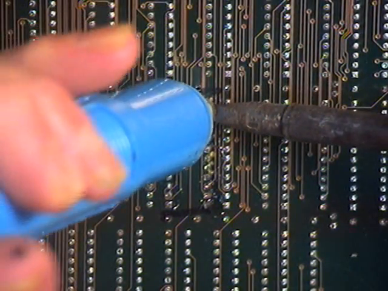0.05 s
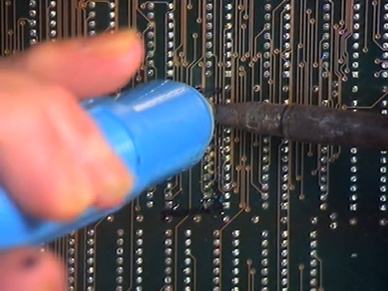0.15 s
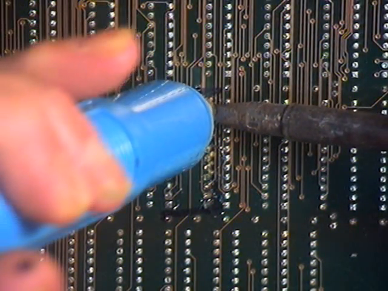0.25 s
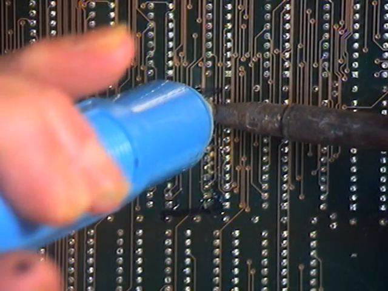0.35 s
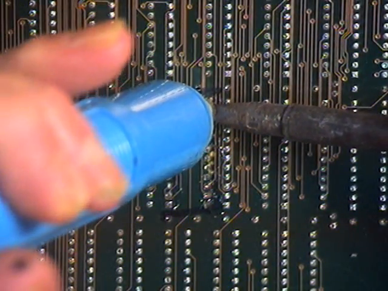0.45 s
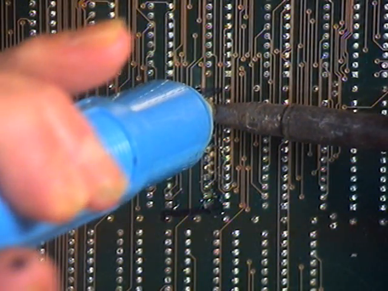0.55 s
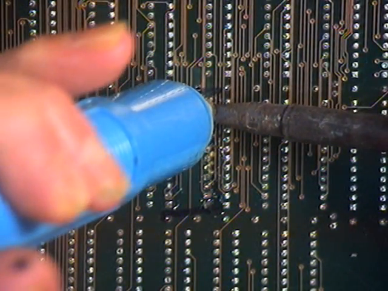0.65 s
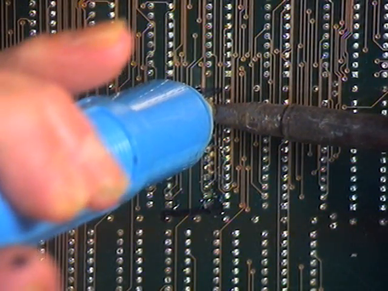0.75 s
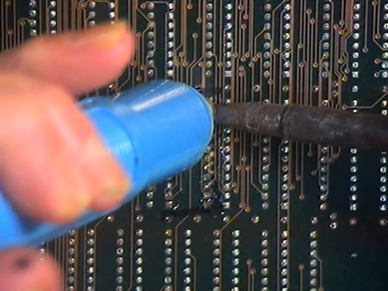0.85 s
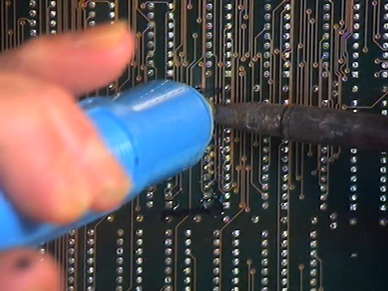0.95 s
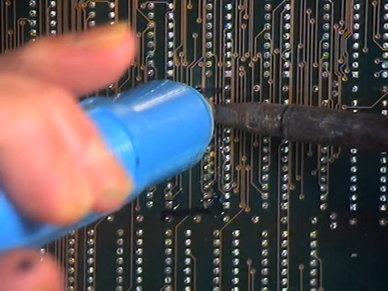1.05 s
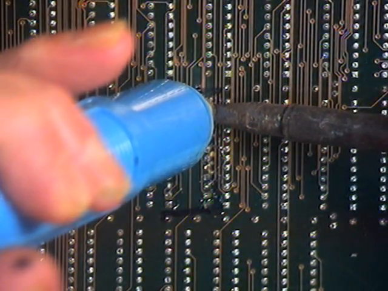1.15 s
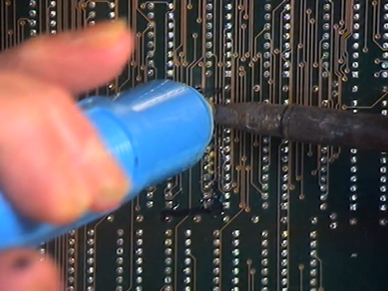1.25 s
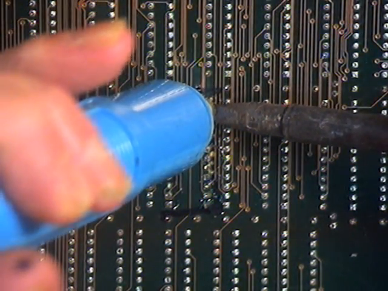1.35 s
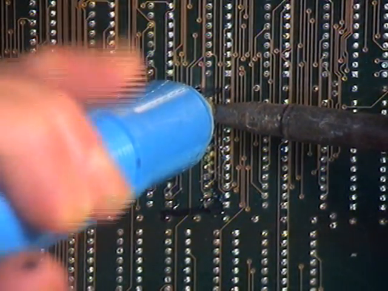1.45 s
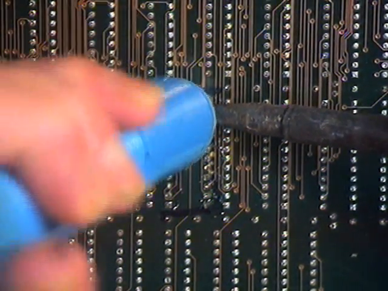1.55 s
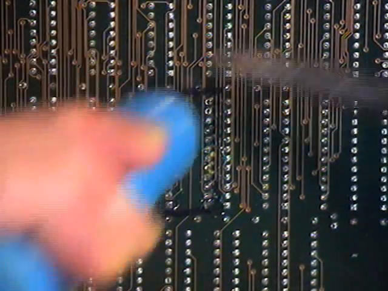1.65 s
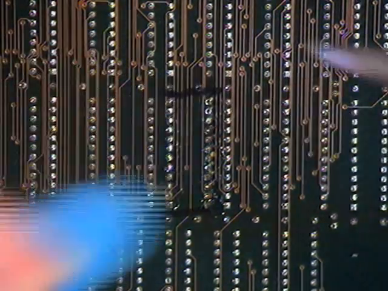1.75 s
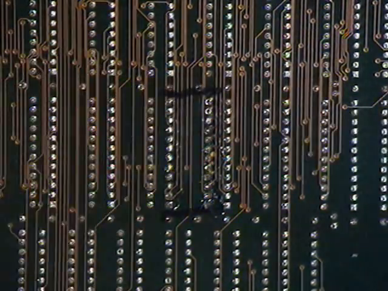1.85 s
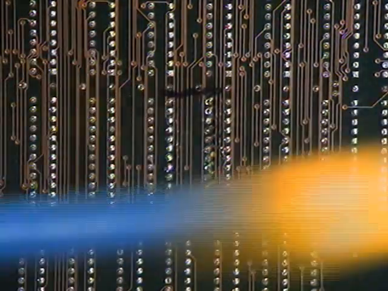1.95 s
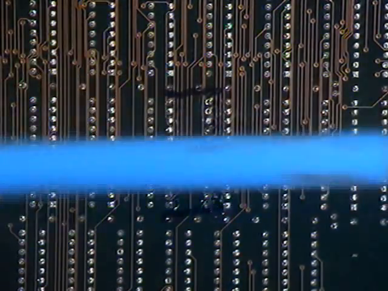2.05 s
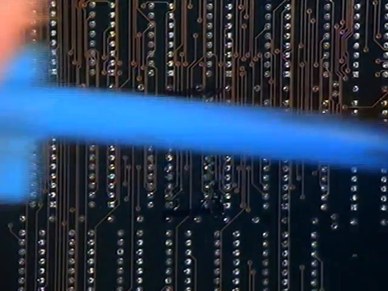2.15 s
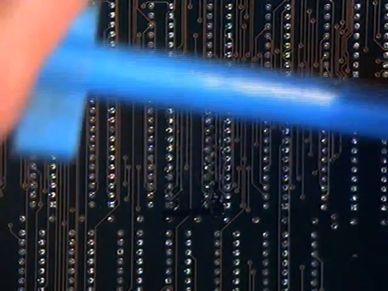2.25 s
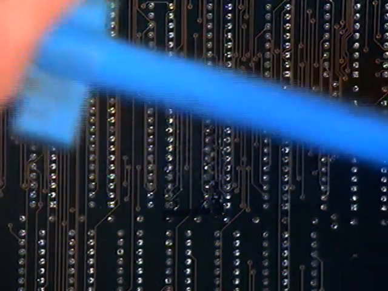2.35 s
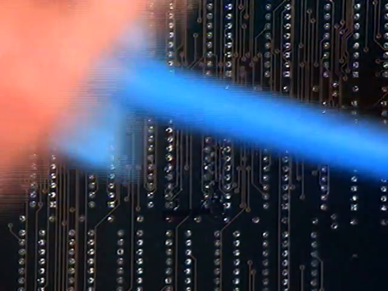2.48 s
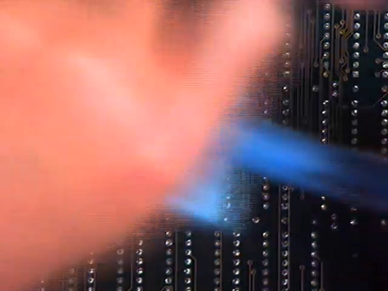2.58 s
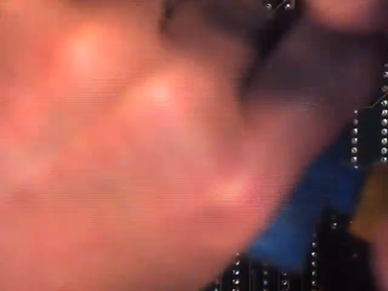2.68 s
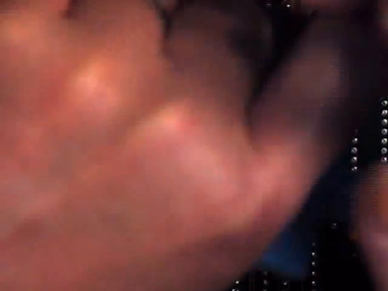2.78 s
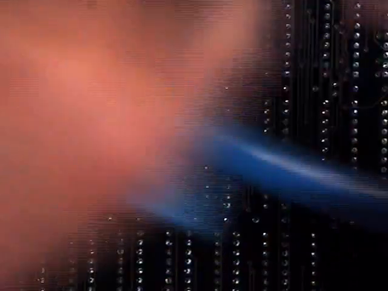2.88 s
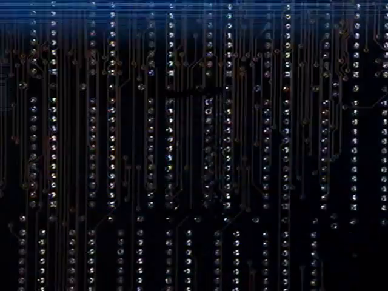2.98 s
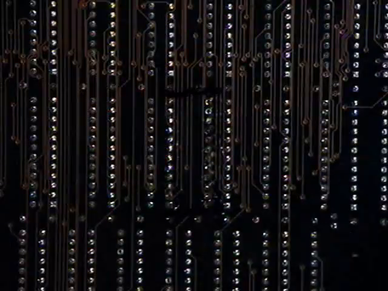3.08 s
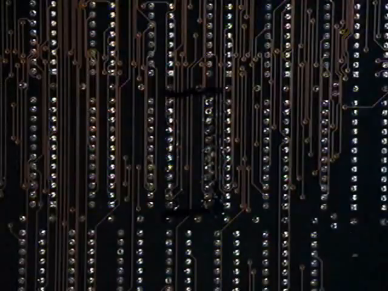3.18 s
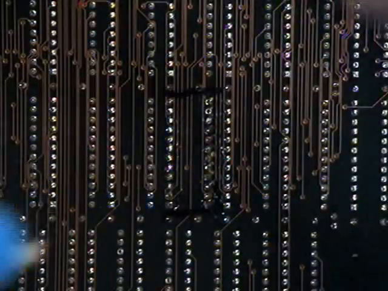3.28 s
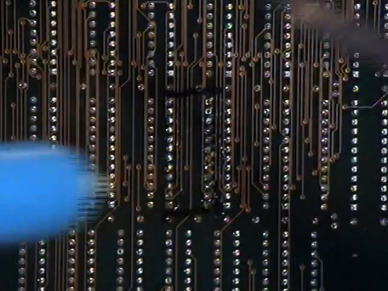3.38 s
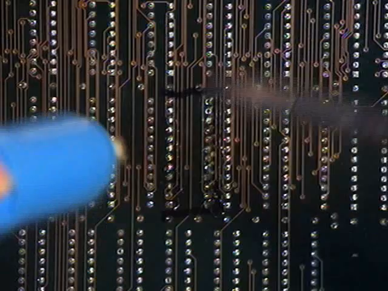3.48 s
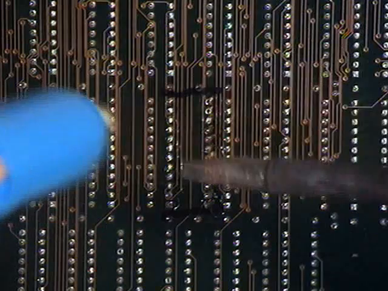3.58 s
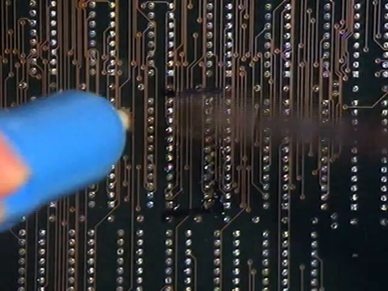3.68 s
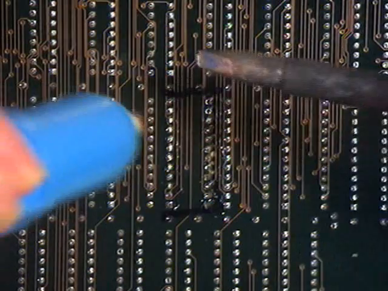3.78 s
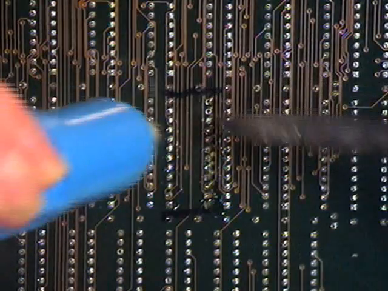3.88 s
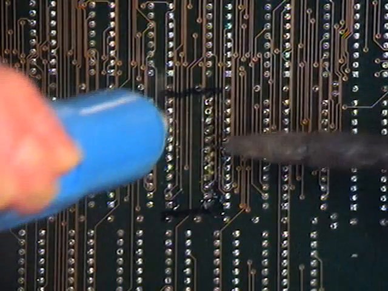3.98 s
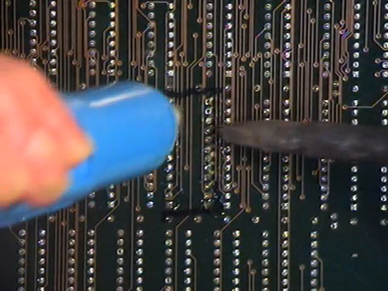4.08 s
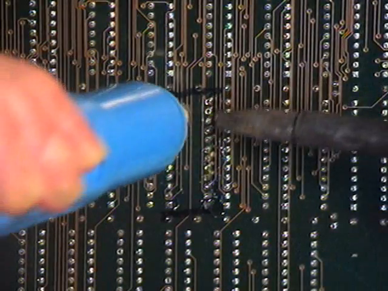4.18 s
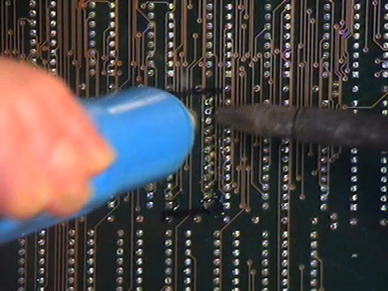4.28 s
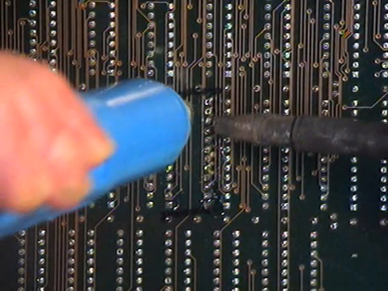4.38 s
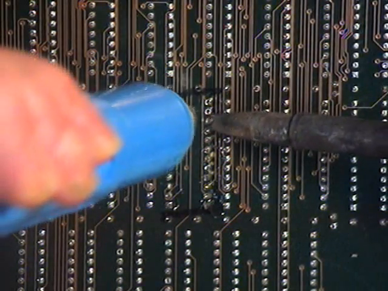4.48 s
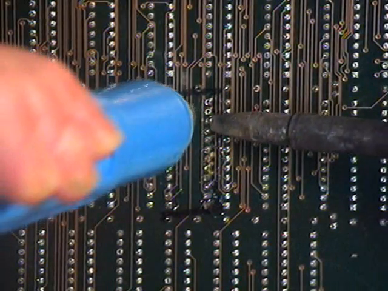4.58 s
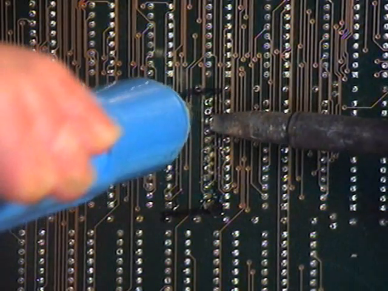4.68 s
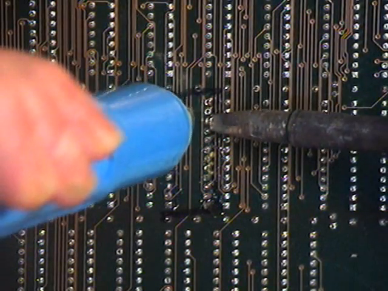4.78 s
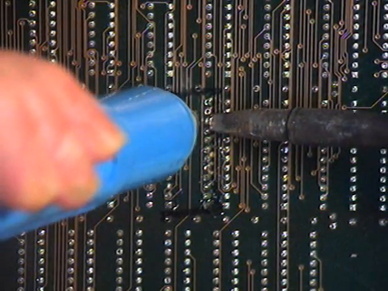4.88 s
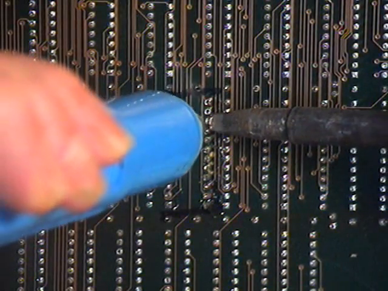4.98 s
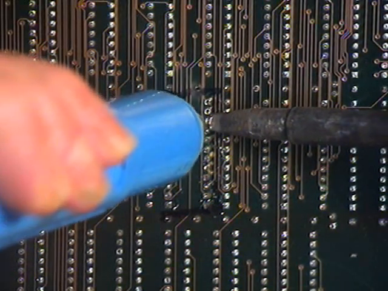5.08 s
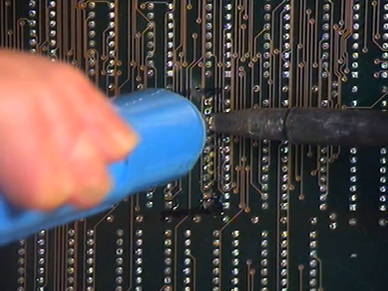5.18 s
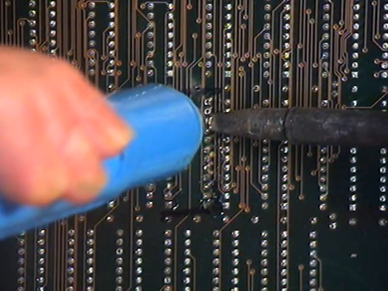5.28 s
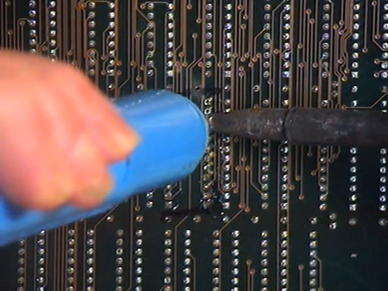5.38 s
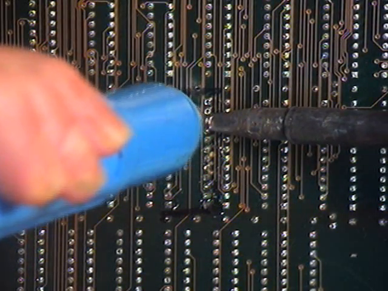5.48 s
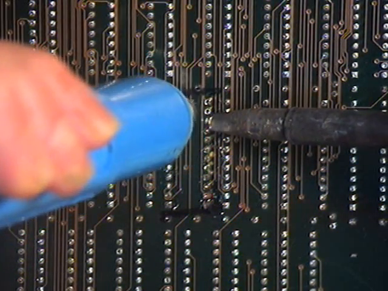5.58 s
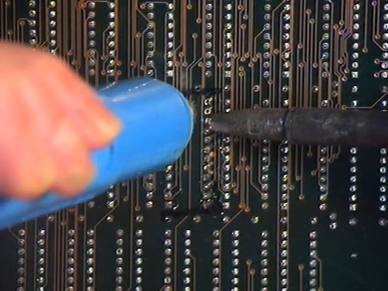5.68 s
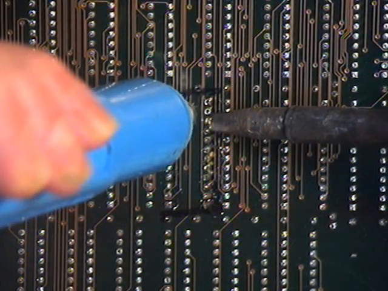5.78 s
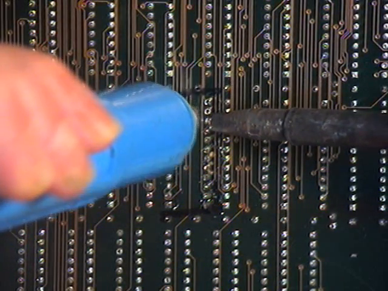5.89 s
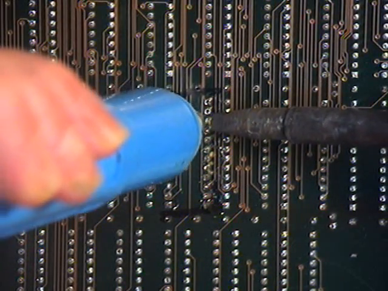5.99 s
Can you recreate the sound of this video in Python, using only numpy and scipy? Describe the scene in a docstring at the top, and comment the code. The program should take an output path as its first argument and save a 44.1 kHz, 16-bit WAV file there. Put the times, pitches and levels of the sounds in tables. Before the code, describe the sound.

At a workbench in a small room, a hand-held plastic solder pump fires with a bright hollow snap, a burst of hiss and a dull thump through the circuit board. About a second later the piston scrapes back and latches with a very hard click, followed by small clacks. Faint taps end it. Close microphone, slightly overloaded on peaks, with steady mains hum, thin buzz, fan drone and hiss behind.

```python
"""In a small room, a spring-loaded solder sucker fires on a circuit board, is pushed back until it latches,
and is set to the next joint. Struck resonances make its plastic barrel ring at each snap; noisy friction
makes it hiss as the piston slides; low modes of the board on the bench thump under the recoil.
Behind it: harmonics of mains hum, a screen's pulse buzz, a fan drone and hiss of air and microphone."""
import sys
import numpy as np
from scipy import signal
from scipy.fft import rfft, irfft
from scipy.io import wavfile

SR = 44100
rng = np.random.default_rng(int(sys.argv[2]) if len(sys.argv) > 2 else 0)


def transcribe(u):
    """Save the signal u as a 16-bit wav file named by the first command-line argument.

    u: samples, shape (n,) or (channels, n), limited to [-1, 1]; the rate is SR.
    q: integer samples, one column per channel.
    """
    v = np.clip(np.atleast_2d(u).T, -1, 1)
    q = np.round(v * 32767).astype(np.int16)
    wavfile.write(sys.argv[1], SR, q)


N = 266231


def from_db(db):
    """Decibel law: amplitude gain of a level in dB."""
    return 10 ** (np.asarray(db) / 20)


def rms_one(x):
    """Power normalisation: scale a signal to an rms of 1."""
    return x / np.sqrt(np.mean(x ** 2) + 1e-20)


def ring(push, hz, t60):
    """Damped resonator: a unit click excites a decaying sine, down 60 dB after t60 seconds."""
    radius = from_db(-60 / (t60 * SR))
    angle = 2 * np.pi * hz / SR
    feedback = [1, -2 * radius * np.cos(angle), radius * radius]
    return signal.lfilter([0, np.sin(angle)], feedback, push + 1e-18)


def burst(length_s):
    """Impulsive contact: unit-energy noise that decays exponentially, long enough for the ring to follow."""
    t = np.arange(SR // 4) / SR
    chatter = rng.standard_normal(len(t)) * np.exp(-t / max(length_s, 2e-4))
    return chatter / np.sqrt(np.sum(chatter ** 2))


def add(out, start_s, x):
    """Superposition: mix a sound in at its start time."""
    i = round(start_s * SR)
    out[i:i + len(x)] += x[:N - i]


def band(x, low_hz, high_hz):
    """Band limitation: a Butterworth band-pass."""
    return signal.sosfilt(signal.butter(2, [low_hz, high_hz], "band", fs=SR, output="sos"), x)


# Mains harmonics. Each row: multiple of the mains frequency, level in dB rms.
HARMONICS = [(1, -49), (6, -76), (7, -71.5)]
MAINS_HZ, MAINS_CREST_S = 59.964, .01147


def hum():
    """Harmonic series: a mains tone and weak overtones whose crests coincide."""
    phase = 2 * np.pi * MAINS_HZ * (np.arange(N) / SR - MAINS_CREST_S)
    return sum(np.sqrt(2) * from_db(db) * np.cos(round(multiple) * phase) for multiple, db in HARMONICS)


BUZZ_HZ, BUZZ_FIRST_S = 75.03, .00418
BUZZ_PEAK_DB, BUZZ_ROUNDING_HZ = -32, 2880


def buzz():
    """Periodic pulse train: one low-passed spike per screen refresh, picked up by the wiring."""
    spikes = np.zeros(N)
    times_s = np.arange(BUZZ_FIRST_S, N / SR, 1 / BUZZ_HZ)
    spikes[np.round(times_s * SR).astype(int)] = 1
    pole = np.exp(-2 * np.pi * BUZZ_ROUNDING_HZ / SR)
    rounded = signal.lfilter([1], np.poly([pole, pole, pole]), spikes)
    return from_db(BUZZ_PEAK_DB) * rounded / rounded.max()


# Fan resonances. Each row: centre in Hz, half-width at half amplitude in Hz, level in dB rms.
FAN_RESONANCES = [(109.7, 0.12, -56), (119.3, 0.085, -56.5), (135.4, 44, -56)]


def drone():
    """Filtered noise: two narrow resonances give steady fan tones that beat together, a wide one a low rumble."""
    hz = np.fft.rfftfreq(N, 1 / SR)
    out = np.zeros(N)
    for centre_hz, width_hz, db in FAN_RESONANCES:
        white = rfft(rng.standard_normal(N))
        resonance = 1 / (1 + ((hz - centre_hz) / width_hz) ** 2)
        out += from_db(db) * rms_one(irfft(white * resonance, N))
    return out


# Spectrum of air and microphone hiss. Each row: frequency in Hz, relative spectral level in dB.
HISS_SPECTRUM = [(25, -11), (60, -8), (200, -5), (400, -4.5), (800, -8), (1500, -8), (3000, -8.5),
                 (5000, -13), (9000, -13), (16000, -14)]
HISS_RMS_DB = -50.5


def hiss():
    """Coloured noise: white noise shaped by a smooth spectral envelope."""
    hz = np.fft.rfftfreq(N, 1 / SR) + 1  # 1 Hz up, to keep the logarithm finite
    at_hz, db = np.transpose(HISS_SPECTRUM)
    colour = from_db(np.interp(np.log(hz), np.log(at_hz), db))
    return from_db(HISS_RMS_DB) * rms_one(irfft(rfft(rng.standard_normal(N)) * colour, N))


# Snaps of trigger, piston and latch. Each row: start in seconds, drive level in dB,
# chatter decay time in seconds (at least 0.2 ms is used), most strongly driven region in Hz.
SNAP_CONTACTS = [(1.543, -14.5, 0.0041, 4800), (1.564, -7.5, 0.007, 2610), (1.727, -30.5, 0.0025, 3150),
                 (2.617, -26.5, 0.0095, 2980), (2.72, -20, .006, 3000), (2.732, -22, 0.0032, 3500),
                 (2.7485, -22, 0.00035, 3470), (2.7503, 6, 0.002, 3970), (2.761, -12, 0.0007, 3840),
                 (2.941, -11.5, 0.0015, 4020), (2.949, -20.5, 0.00092, 4400), (2.97, -24, 0.0037, 4400),
                 (4.381, -22, 0.0028, 4460), (4.386, -28, 0.0027, 2780), (4.524, -33.5, 0.0026, 3500)]
# Barrel modes, also driven by the slides. Each row: frequency in Hz, relative level in dB,
# free ring time t60 in seconds (before the damping that each function applies).
BARREL_MODES = [(2070, 2.5, 0.052), (2400, -9, 0.038), (2760, -16, 0.033), (2850, -9, 0.052),
                (3272, -3, 0.058), (3680, -0.5, 0.031), (4063, 1.5, 0.05), (4610, 1, 0.031),
                (5470, 0, 0.017), (6520, -11.5, 0.053), (7330, -7, 0.019), (8280, -7.5, 0.032),
                (8700, -28, 0.079), (9500, -31, 0.036), (9370, -15, 0.081), (9800, -10, 0.052),
                (12700, -50, .02), (14200, -33, .015)]
GRIP_DAMPING = .2  # share of the free ring time left in the hand
AWAY_DB_PER_OCTAVE = -12.0  # loss away from the struck region
CRACK_DB, CRACK_OCTAVES = 10.5, 1.36  # contact noise: gain, and reach above the region (half that below)


def snaps():
    """Modal excitation: a chattering contact cracks and drives most the barrel modes near its region."""
    out = np.zeros(N)
    for start_s, db, length_s, region_hz in SNAP_CONTACTS:
        push = burst(length_s)
        luck = rng.normal(0, 1.5, len(BARREL_MODES))  # uneven mode levels, in dB
        crack = band(push, region_hz / 2 ** (CRACK_OCTAVES / 2), region_hz * 2 ** CRACK_OCTAVES)
        add(out, start_s, from_db(db + CRACK_DB) * crack)
        for k, ((hz, mode_db, t60), luck_db) in enumerate(zip(BARREL_MODES, luck)):
            away_db = AWAY_DB_PER_OCTAVE * abs(np.log2(hz / region_hz))
            gain = (-1) ** k * from_db(db + mode_db + away_db + luck_db)  # neighbours in opposite phase
            add(out, start_s, gain * ring(push, hz, GRIP_DAMPING * t60))
    return band(out, 1000, 19400)


# Piston strokes and hand slips. Each row: start in seconds, swell in seconds, hold in seconds,
# drive level in dB, treble share in dB, fall in dB per second.
STROKES = [(1.557, 0.0057, 0.004, -22, -1, 342), (1.674, 0.0054, .006, -58, -6, 500),
           (1.712, .006, 0.018, -46.5, -4, 300), (2.567, 0.048, .01, -35.5, -4, 250),
           (2.701, 0.055, 0.0035, -29, -0.5, 500), (2.745, 0.0018, 0.0033, -24.5, -3.5, 200),
           (2.926, .006, 0.0044, -30, -3, 500), (2.969, .015, 0.048, -37, 1.5, 500),
           (3.027, 0.025, 0.0068, -36, -6, 700), (3.154, 0.021, 0.14, -57, -4, 300)]
SWELL_DB = 31  # a stroke swells by this much, holds, then dies
SLIDE_DAMPING = .073  # share of the barrel's free ring time left under friction


def slides():
    """Friction excitation: grainy noise drives the barrel; treble modes and nozzle hiss have their own share."""
    t, body, treble = np.arange(N) / SR, np.zeros(N), np.zeros(N)
    for start_s, swell_s, hold_s, db, share_db, fall_db_per_s in STROKES:
        swell_db = SWELL_DB * np.minimum((t - start_s) / swell_s - 1, 0)
        fall_db = -fall_db_per_s * np.maximum(t - start_s - swell_s - hold_s, 0)
        level = from_db(db + swell_db + fall_db) * (t > start_s)
        body += level
        treble += from_db(share_db) * level
    roughness_db = 2.2 * rms_one(band(rng.standard_normal(N), 38, 300))
    grain = rng.standard_normal(N) * from_db(roughness_db)
    modes = [from_db(db) * ring(grain, hz, SLIDE_DAMPING * t60) for hz, db, t60 in BARREL_MODES]
    # Eight lower modes with friction noise, the rest with nozzle hiss.
    low = rms_one(sum(modes[:8])) + 1.3 * rms_one(band(grain, 1880, 4370))
    high = rms_one(sum(modes[8:])) + 0.93 * rms_one(band(grain, 3600, 8700))
    return body * rms_one(band(low, 1010, 7100)) + treble * rms_one(band(high, 3600, 12800))


# Knocks on the board. Each row: start in seconds, drive level in dB, rattle decay time in seconds,
# contact sharpness (upper edge of the push) in Hz.
BOARD_CONTACTS = [(1.558, -8.5, 0.019, 517), (1.575, -20, .004, 1860), (1.594, -6, 0.01, 334),
                  (1.563, 0.5, 0.0072, 202), (1.585, -2, .008, 160), (1.622, 0.5, 0.017, 139),
                  (1.721, -24, .01, 160), (2.174, -39.5, 0.021, 1480), (2.615, -26.5, 0.0025, 900),
                  (2.932, -30.5, 0.0014, 1830), (2.938, -25, 0.0021, 480), (3.015, -36.5, 0.0091, 505),
                  (3.184, -37, 0.027, 1500), (3.951, -42.5, 0.019, 1770), (4.006, -23.5, 0.017, 250),
                  (4.403, -43, 0.021, 2000), (4.526, -30, 0.0067, 1270), (4.62, -25, 0.0076, 201)]
# Modes of board and bench. Each row: frequency in Hz, relative level in dB, ring time t60 in seconds.
BOARD_MODES = [(95.7, -9.5, 0.3), (128.2, -5, 0.22), (188.2, -2, 0.15), (250, -3.5, 0.11),
               (311, -4.5, 0.09), (412, -2.5, 0.048), (565, -0.5, 0.021), (850, -4.5, 0.0083),
               (1020, -7.5, 0.028), (1276, -4.5, 0.025), (1540, -5.5, 0.042), (2620, 11.5, 0.023),
               (3980, -6, 0.032)]
KNOCK_OCTAVES = 1.65  # span of the push below its sharpness
LOW_CUT_HZ = 67  # the microphone picks up little of the knocks below this


def knocks():
    """Contact stiffness: a softer blow has a lower band and so moves lower modes of the board."""
    out = np.zeros(N)
    for start_s, db, length_s, sharp_hz in BOARD_CONTACTS:
        low_hz = sharp_hz / 2 ** KNOCK_OCTAVES
        push = band(burst(length_s), low_hz, sharp_hz) * sharp_hz / 1000
        modes = np.zeros(len(push))
        for k, (hz, mode_db, t60) in enumerate(BOARD_MODES):
            modes += (-1) ** k * from_db(mode_db) * ring(push, hz, t60)
        add(out, start_s, from_db(db) * band(modes, low_hz, 7100))
    return band(out, LOW_CUT_HZ, 6600)


ROOM_DB, ROOM_T60_S, ROOM_DULL_HZ = -16, 0.41, 7500


def room(x):
    """Diffuse reverberation: convolution with decaying noise that starts after the first wall, at 4 ms."""
    t = np.arange(int(.6 * SR)) / SR
    reflections = band(rng.standard_normal(len(t)), 143, ROOM_DULL_HZ)
    tail = reflections * from_db(-60 * t / ROOM_T60_S) * (t > .004)
    unit_tail = tail / np.sqrt(np.sum(tail ** 2))
    return from_db(ROOM_DB) * signal.fftconvolve(x, unit_tail)[:N]


def scene():
    """Superposition: pump and board with their reverberation, over the steady background."""
    background = hum() + buzz() + drone() + hiss()
    near = snaps() + slides() + knocks()
    return (near + room(near) + background)[None]


OVERLOAD = .46  # amplitude that the input cannot exceed
CUTOFF_HZ = 15900


def record(dry):
    """Saturation and band limitation: the input overloads on loud peaks and the top is cut steeply."""
    clipped = dry / (1 + np.abs(dry / OVERLOAD) ** 6) ** (1 / 6)
    # The loss reaches 70 dB 500 Hz above the cutoff.
    return signal.sosfilt(signal.cheby2(14, 70, CUTOFF_HZ + 500, fs=SR, output="sos"), clipped)


dry = scene()
out = record(dry)
transcribe(out)
```